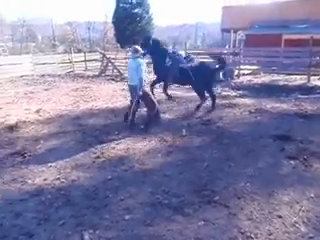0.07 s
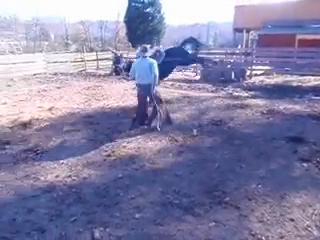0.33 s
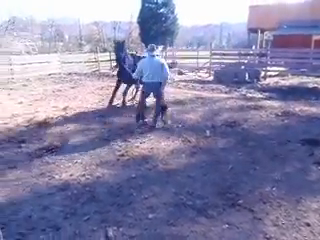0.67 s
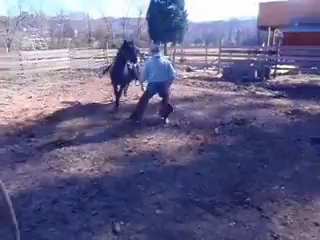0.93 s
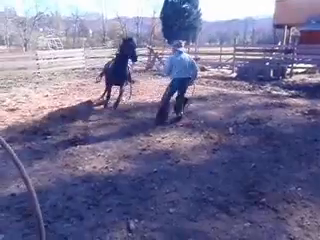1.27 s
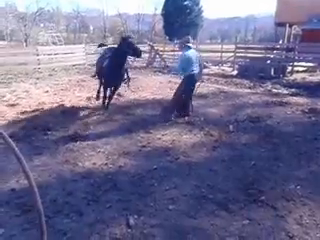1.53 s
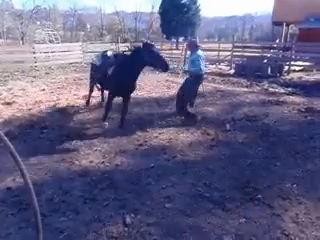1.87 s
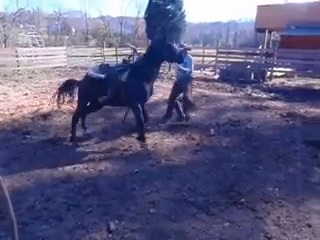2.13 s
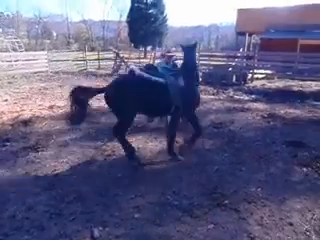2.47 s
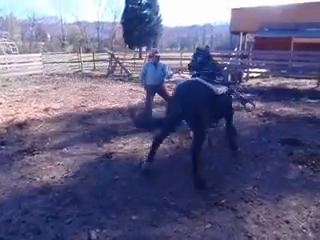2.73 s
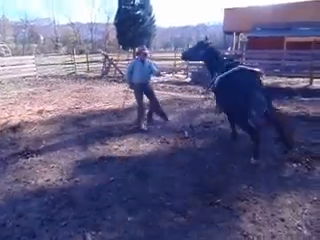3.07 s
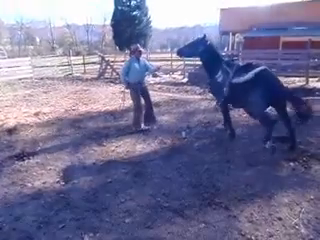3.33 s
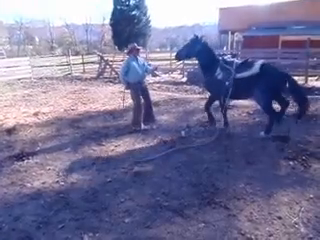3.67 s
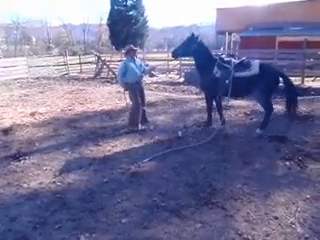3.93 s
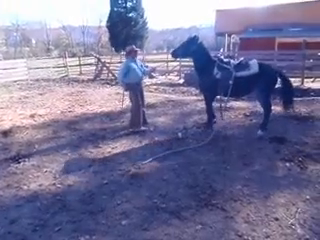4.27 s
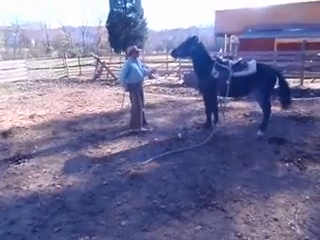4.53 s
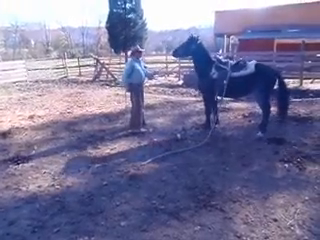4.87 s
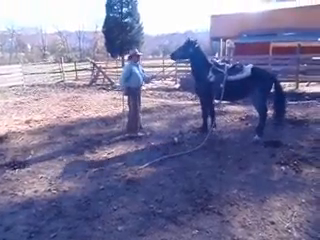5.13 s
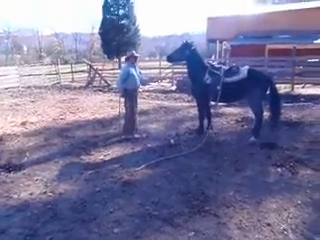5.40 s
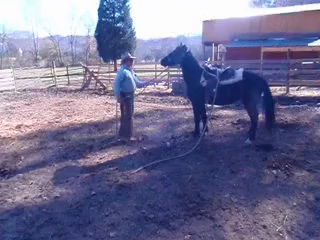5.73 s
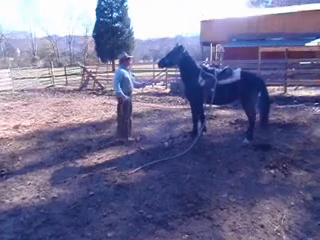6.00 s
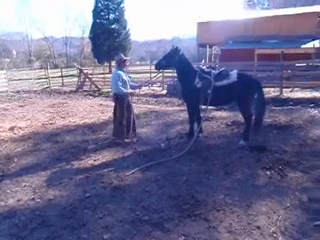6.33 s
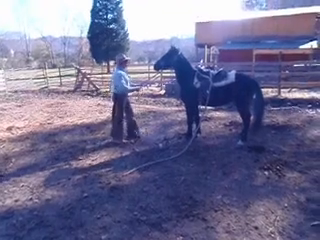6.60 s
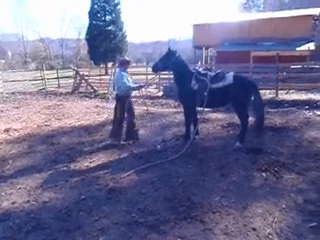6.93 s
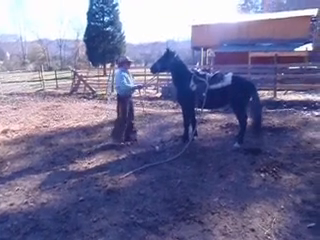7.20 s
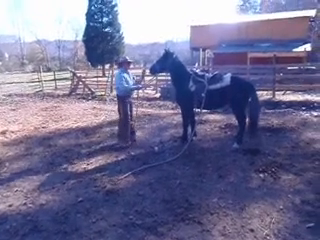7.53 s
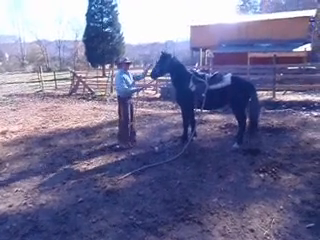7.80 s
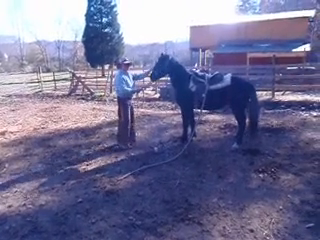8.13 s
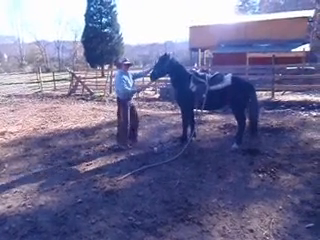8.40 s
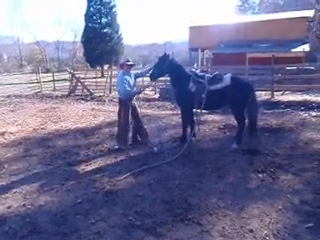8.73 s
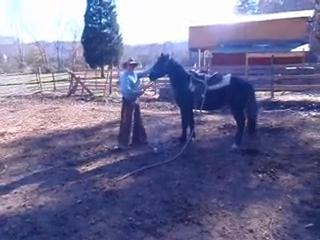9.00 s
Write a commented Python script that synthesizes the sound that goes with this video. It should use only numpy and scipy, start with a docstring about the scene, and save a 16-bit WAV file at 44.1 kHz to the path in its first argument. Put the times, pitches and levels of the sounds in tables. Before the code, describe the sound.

A steady hiss runs for about nine seconds, with a soft low thump repeating twice a second. The sound is narrow and coarse, as from a small camera microphone outdoors, with no echo. From the start a horse scrambles on dirt, with faint hoof crunches, scuffs and sprays of loose soil. At 0.5 seconds, as it kicks, a sharp pop overloads the microphone, by far the loudest event, leaving a low buzz that fades within half a second. The level ducks and creeps back. More hoof steps follow from 1 to 3 seconds. Tack gives a few hollow knocks near 1.9 seconds and light clinks around 2.5. Three faint, thin, distant whistles, perhaps a bird, come between 3 and 3.5 seconds. By 4 seconds the horse stands still. Hiss and thumps continue, with a faint scuff at 6.7 seconds and one clink near 9.

```python
"""Under steady hiss a horse bucks and scrambles round a dirt corral: faint dirt sprays, hooves, scuffs.
A soft low thump, probably from the small camera, repeats twice a second; the sound is narrow and coarse.
At 0.5 s, as the horse kicks, a sharp pop overloads the camera and leaves a short buzz; the gain ducks
and creeps back. Tack knocks and clinks, then thin far whistles sound near 3 s.
From 4 s the horse stands still: hiss and thumps go on, with one late scuff and one clink."""
import sys
import numpy as np
from scipy import signal
from scipy.fft import rfft, irfft
from scipy.io import wavfile

SR = 44100
rng = np.random.default_rng(int(sys.argv[2]) if len(sys.argv) > 2 else 0)


def wrap_up_sound(samples):
    """Save the sound to the file named by the first command line argument, as 16-bit audio."""
    columns = np.atleast_2d(samples).T
    # keep every value between -1 and 1, then stretch to whole-number steps
    tamed = np.clip(columns, -1, 1)
    steps = np.round(tamed * 32767).astype(np.int16)
    wavfile.write(sys.argv[1], SR, steps)


N = 399987
TIME_S = np.arange(N) / SR
CONVERTER_HZ = 8000

# hiss spectrum: f/Hz, relative density/dB
HISS_SPECTRUM = [(15, -42.5), (25, -11), (59, -2), (119, 0.5), (204, -2), (237, -3.5), (366, -5),
                 (425, -5.5), (763, -6), (832, -6), (1030, -6.5), (1810, -9.5), (2850, -16.5),
                 (3860, -24.5), (4400, -30), (5720, -52), (9680, -120)]
# the horse's effort, as level of thrown dirt: t/s, level/dB
DIRT_EFFORT = [(0, -52.5), (.45, -54.5), (1.15, -53.5), (1.45, -56.5), (2.05, -54), (2.6, -53.5),
               (2.85, -55.5), (3.549, -54.5), (4.1, -69.5)]
# hoof blows: t/s, crunch level/dB, crunch f/Hz, crunch decay/s, thud level/dB
HOOF_BLOWS = [(.026, -34, 2870, 0.0073, -33.5), (.216, -32.5, 1460, 0.0065, -36),
              (.252, -26, 1480, .0025, -43), (1.014, -35, 1630, .007, -41.5),
              (1.144, -44, 1480, 0.0038, -40), (1.56, -41, 2390, 0.021, -46.5),
              (1.656, -43.5, 1620, 0.028, -39.5), (1.803, -36.5, 1590, .008, -47),
              (2.043, -47, 2200, 0.014, -36), (2.228, -37, 1480, 0.0064, -39),
              (2.961, -36, 1520, .009, -43.5)]
# hoof or boot drags: mid t/s, length/s, level/dB, centre f/Hz
DIRT_DRAGS = [(.41, .12, -45.5, 1645), (1.119, .06, -45, 730), (1.672, .05, -49.5, 2760),
              (2.035, 0.077, -48.5, 2210), (2.595, .1, -47, 1210), (6.688, .14, -56.5, 2930)]
# hollow knocks: t/s, peak level/dB
TACK_KNOCKS = [(1.876, -32.5), (1.8803, -29.5), (1.932, -37.5), (1.988, -41)]
# light clinks: t/s, ring level/dB, f/Hz
TACK_CLINKS = [(2.448, -40, 2430), (2.531, -39.5, 1930), (2.55, -39.5, 2950), (2.574, -39, 2220),
               (2.588, -42, 3190), (2.615, -37.5, 1010), (8.975, -43, 2560)]
# far whistles: mid t/s, length/s, level/dB, f/Hz
FAR_WHISTLES = [(2.975, 0.042, -51, 3240), (3.048, 0.069, -54, 3410), (3.429, 0.078, -50.5, 3340)]


def undb(db):
    """Decibels to gain."""
    return 10 ** (np.asarray(db) / 20)


def unit(x):
    """Scale to rms 1."""
    return x / np.sqrt(np.mean(x ** 2))


def add(track, at_s, sound):
    """Mix in from at_s; drop what falls outside."""
    start = int(at_s * SR)
    part = sound[max(-start, 0):max(N - start, 0)]
    track[max(start, 0):max(start, 0) + len(part)] += part


def cut(x, hz, kind, order):
    """Plain "low" or "high" pass."""
    return signal.sosfilt(signal.butter(order, hz, kind, fs=SR, output="sos"), x)


def resonate(x, hz, width_hz):
    """One resonance, gain 1 at centre."""
    return signal.lfilter(*signal.iirpeak(hz, hz / width_hz, fs=SR), x)


def grit(hz, width_hz, scatter_db):
    """0.5 s of uneven grain clicks through one resonance; rms 1."""
    count = CONVERTER_HZ // 2
    clicks = rng.choice([-1, 1], count) * undb(scatter_db * rng.random(count))
    return unit(resonate(signal.resample_poly(clicks, SR, CONVERTER_HZ), hz, width_hz))


def swell(sound, length_s):
    """Smooth rise and fall about the middle."""
    t = (np.arange(len(sound)) - len(sound) / 2) / SR
    return sound * np.exp(-2 * (t / length_s) ** 2)


def hiss(rms_db=-45.5):
    """Steady microphone hiss and outdoor air."""
    hz, db = np.transpose(HISS_SPECTRUM)
    bins_hz = np.maximum(np.arange(N // 2 + 1) * SR / N, 1)
    colour = undb(np.interp(np.log(bins_hz), np.log(hz), db))
    return undb(rms_db) * unit(irfft(rfft(rng.standard_normal(N)) * colour, N))


def slide(length_s, hz):
    """Loose dirt slides and scatters: a short swell of grains."""
    return swell(grit(hz, width_hz=.85 * hz, scatter_db=22.0), length_s)


def sprays(rate_hz=9, jitter_s=.02, scatter_db=2.0):
    """Uneven dirt sprays follow the horse's effort and end when it stands."""
    out = np.zeros(N)
    times_s, effort_db = np.transpose(DIRT_EFFORT)
    for beat_s in np.arange(0, times_s[-1], 1 / rate_hz):
        late, size = rng.standard_normal(2)
        mid_s = beat_s + jitter_s * late
        db = np.interp(mid_s, times_s, effort_db) + scatter_db * size
        spray = undb(db) * slide(length_s=.08, hz=1990)
        add(out, mid_s - len(spray) / SR / 2, spray)
    return out


def burst(hz, width_hz, decay_s, rise_s=.00044):
    """Fast-dying grains in one resonance, dulled by soft contact."""
    grains = unit(cut(grit(hz, width_hz, scatter_db=12.5), 1.5 * hz, "low", order=2))
    t = TIME_S[:len(grains)]
    return grains * (1 - np.exp(-t / rise_s)) * np.exp(-t / decay_s)


def hooves():
    """Each blow crushes loose dirt and thuds on the packed ground beneath."""
    out = np.zeros(N)
    for at_s, crunch_db, hz, decay_s, thud_db in HOOF_BLOWS:
        add(out, at_s, undb(crunch_db) * burst(hz, width_hz=.85 * hz, decay_s=decay_s))
        add(out, at_s, undb(thud_db) * burst(hz=774, width_hz=330, decay_s=.009))
    return out


def thumps(first_s=.0973, period_s=.5145, db=-32.5, scatter_db=1.3, hz=104, half_length_s=.0052):
    """One low swing per beat, down and back; probably the camera itself."""
    out = np.zeros(N)
    t = TIME_S[:SR // 20] - 1 / 40
    swing = -np.cos(2 * np.pi * hz * t) * np.exp(-(t / half_length_s) ** 2)
    for beat in range(int(TIME_S[-1] / period_s) + 1):
        slip_s = .009 * min(beat / 3, 1) ** 2  # first three gaps slightly longer
        mid_s = first_s + beat * period_s + slip_s
        add(out, mid_s + t[0], undb(db + scatter_db * rng.standard_normal()) * swing)
    return out


def scuffs():
    """A hoof or boot drags through dirt."""
    out = np.zeros(N)
    for mid_s, length_s, db, hz in DIRT_DRAGS:
        drag = slide(length_s, hz)
        add(out, mid_s - len(drag) / SR / 2, undb(db) * drag)
    return out


def pop(at_s=.49475, length_s=.0045, db=3.0, coupling_hz=76, edge_hz=2150):
    """Square jolt, edges rounded; the input's bass cut makes each edge swing back."""
    jolt = -undb(db) * ((TIME_S >= at_s) & (TIME_S < at_s + length_s))
    coupled = cut(jolt, coupling_hz, "high", order=2)
    return cut(coupled, edge_hz, "low", order=2)


def buzz(at_s=.5182, hz=82.8, db=-7, t60_s=.46, pulse_s=.0008, hum_db=-30.5, hum_t60_s=.93):
    """Narrow pulses die away after the pop; their fundamental hums on longer."""
    since_s = np.maximum(TIME_S - at_s, 0)
    from_pulse_s = (since_s * hz % 1 - .5) / hz
    pulses = undb(db - 60 * since_s / t60_s) * np.exp(-np.abs(from_pulse_s) / pulse_s)
    hum = undb(hum_db - 60 * since_s / hum_t60_s) * np.cos(2 * np.pi * hz * from_pulse_s)
    return cut((pulses + hum) * (since_s > 0), hz=40, kind="high", order=1)


def ring(hz, t60_s, contact_s):
    """One softly struck mode; peak 1."""
    t = TIME_S[:SR // 2]
    envelope = (1 - np.exp(-t / contact_s)) * undb(-60 * t / t60_s)
    tone = envelope * np.sin(2 * np.pi * hz * t)
    return tone / tone.max()


def knocks():
    """One hollow mode answers every knock; probably saddle fittings."""
    out = np.zeros(N)
    for at_s, db in TACK_KNOCKS:
        add(out, at_s, undb(db) * ring(hz=1232, t60_s=.03, contact_s=.0014))
    return out


def clinks(rasp_db=-3.0):
    """Tack shakes, probably bit and buckles: each piece rasps on its neighbour and rings."""
    out = np.zeros(N)
    for at_s, db, hz in TACK_CLINKS:
        rasp = undb(rasp_db) * burst(hz, width_hz=1500, decay_s=.009)
        add(out, at_s, undb(db) * (ring(hz, t60_s=.036, contact_s=.002) + rasp))
    return out


def whistles():
    """Faint wavering notes of narrowband noise; perhaps a distant bird."""
    out = np.zeros(N)
    for mid_s, length_s, db, hz in FAR_WHISTLES:
        band = grit(hz, width_hz=260, scatter_db=6.0)
        note = swell(resonate(band, hz, width_hz=470), length_s)
        add(out, mid_s - len(note) / SR / 2, undb(db) * note)
    return out


def scene():
    """Mono sum at the camera input; open ground, no echo."""
    camera = hiss() + thumps() + pop() + buzz()
    horse = hooves() + knocks() + clinks() + scuffs()
    return (camera + horse + whistles() + sprays())[None]


def gain_control(x, threshold_db=-17.0, lag_s=.021, release_db_per_s=37.0):
    """Peaks over threshold duck the gain after a lag; it climbs back at a steady rate."""
    excess_db = np.maximum(20 * np.log10(np.abs(x) + 1e-9) - threshold_db, 0)
    climb_db = release_db_per_s * TIME_S
    duck_db = np.maximum.accumulate(excess_db + climb_db) - climb_db
    return x * undb(-np.interp(TIME_S - lag_s, TIME_S, duck_db))


def converter(x, full_scale=.7, steps=128):
    """Slow 8-bit converter: saturates on the pop; its steps crackle on ducked sound."""
    slow = signal.resample_poly(x, CONVERTER_HZ, SR)
    codes = np.clip(np.floor(slow / full_scale * steps), -steps, steps)
    smooth = signal.resample_poly(codes / steps, SR, CONVERTER_HZ, window=("kaiser", 14))[:N]
    return full_scale * np.clip(smooth, -1, 1)  # the pop's clipped overshoot: a thin bright click


def record(dry, band_hz=3550, top_hz=10200):
    """Camera chain: gain control, band limit, converter, output low-pass."""
    narrow = cut(gain_control(dry[0]), band_hz, "low", order=6)
    top_cut = signal.ellip(8, .2, 70, top_hz, fs=SR, output="sos")
    return signal.sosfilt(top_cut, converter(narrow))[None]


dry = scene()
out = record(dry)
wrap_up_sound(out)
```